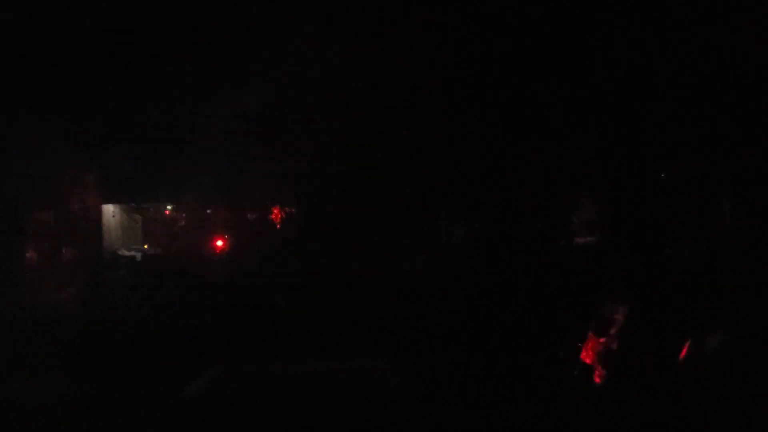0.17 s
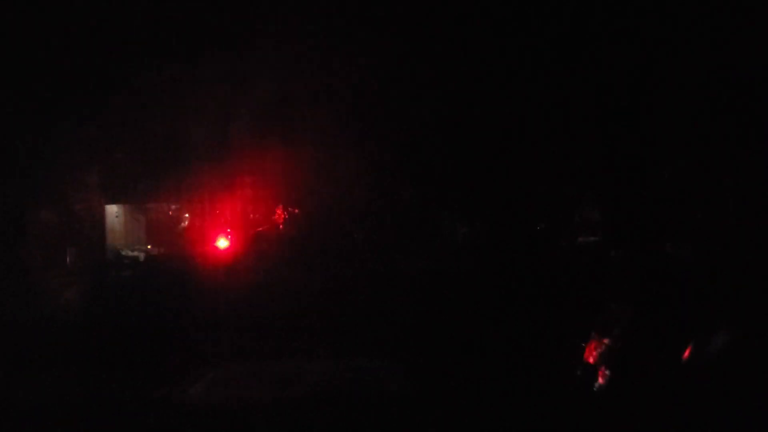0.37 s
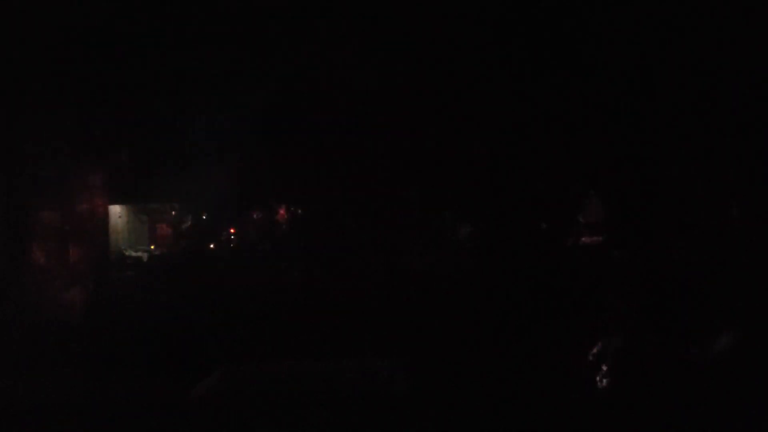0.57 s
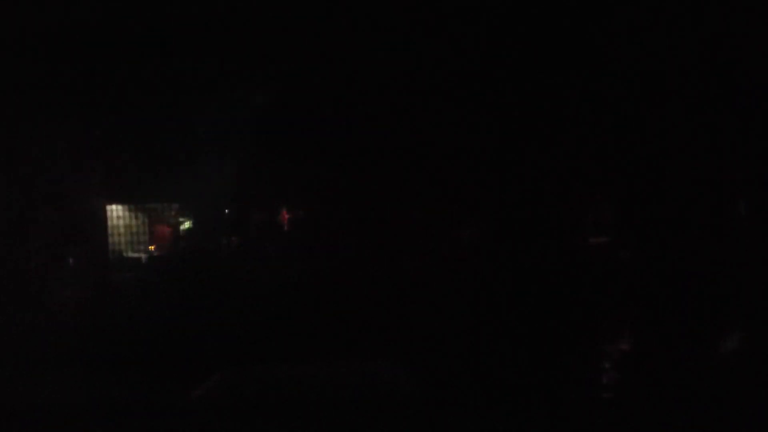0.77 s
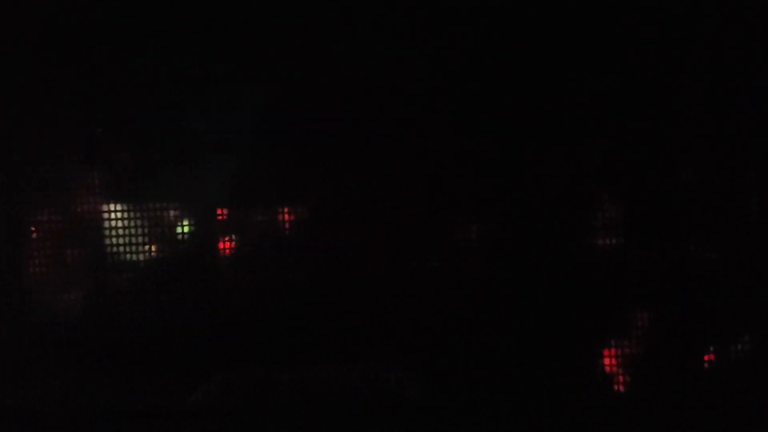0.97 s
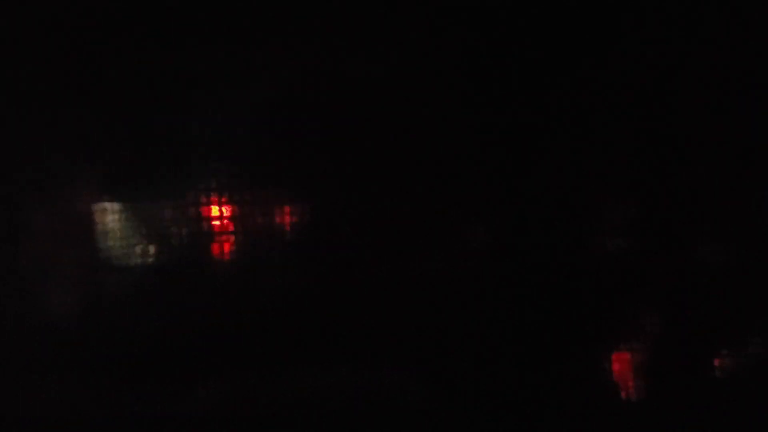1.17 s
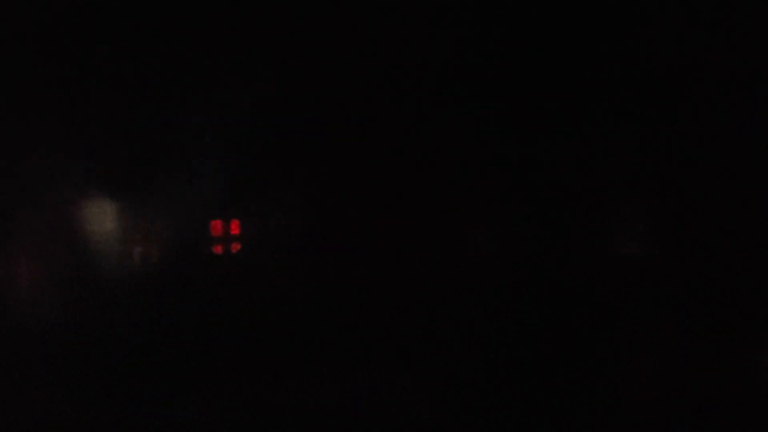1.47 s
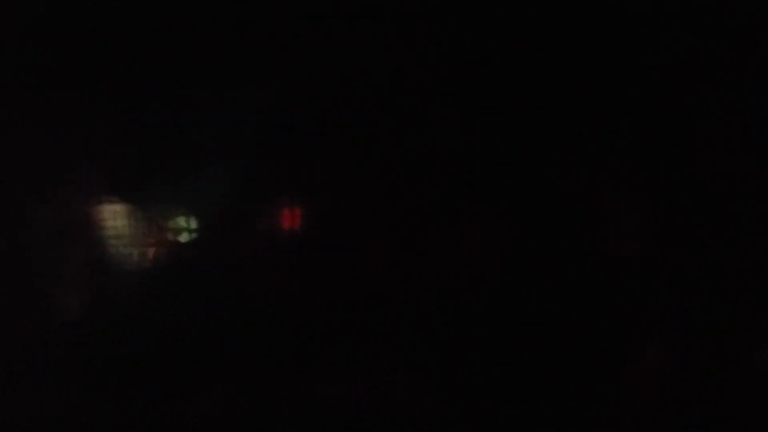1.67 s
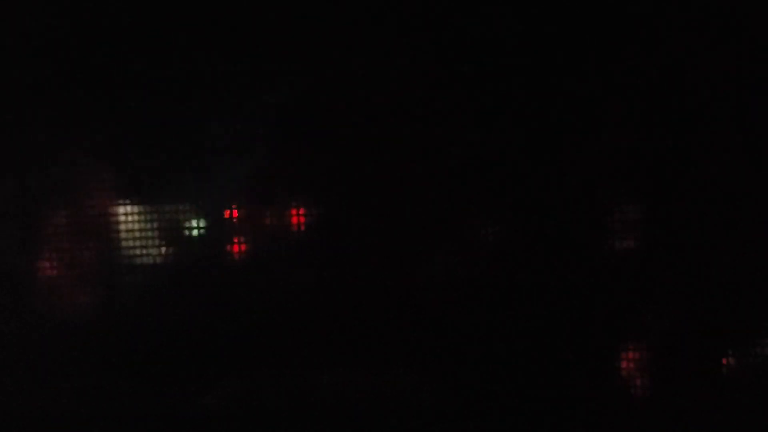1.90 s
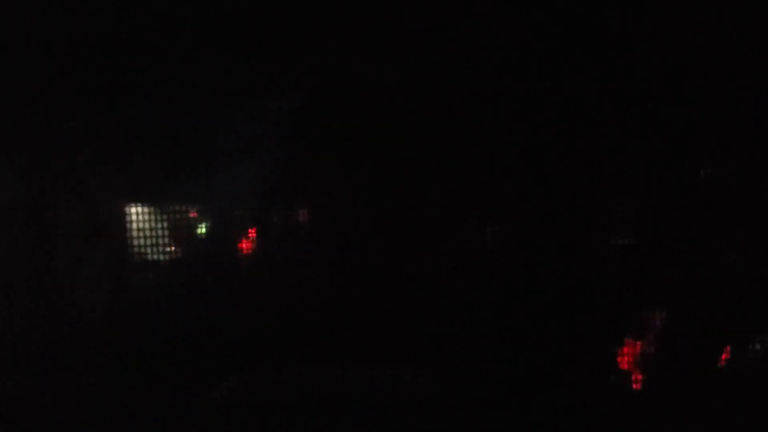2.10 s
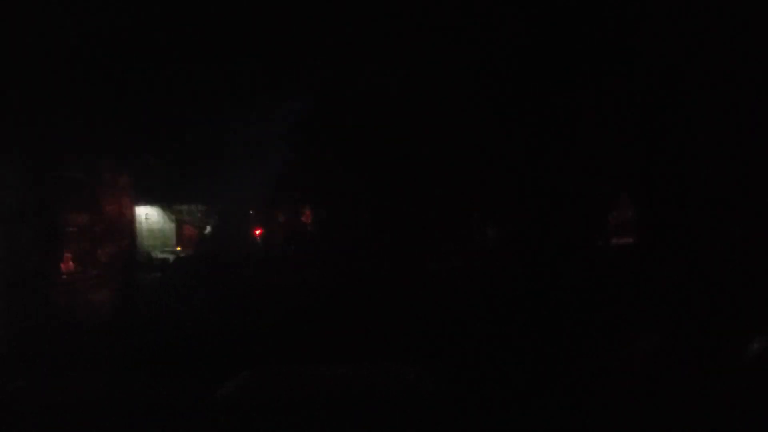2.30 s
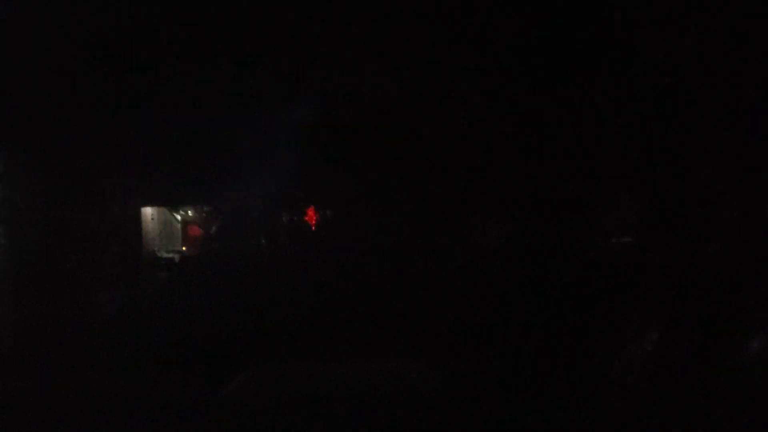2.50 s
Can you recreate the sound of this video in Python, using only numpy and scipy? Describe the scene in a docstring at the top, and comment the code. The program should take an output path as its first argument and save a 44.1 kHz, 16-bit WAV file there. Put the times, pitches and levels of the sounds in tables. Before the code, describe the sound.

Muffled, gusting wind heard from indoors over a steady hum, then two quick close clicks.

```python
"""Storm wind heard inside a house at night. From the start the walls pass a low, gusting rumble and a
faint roar, over an appliance's steady hum and the recorder's own hiss. At 1.5 s comes one small tick,
and near 2 s the wind moans faintly. At 2.3 s and 2.44 s a sharp double click sounds close to the
microphones, like a catch pressed and let go: each snap rings damped modes, and the room answers briefly."""
import sys
import numpy as np
from scipy import signal
from scipy.fft import rfft, irfft
from scipy.io import wavfile
from scipy.ndimage import uniform_filter1d

SR = 44100
rng = np.random.default_rng(int(sys.argv[2]) if len(sys.argv) > 2 else 0)


def inscribe(sig):
    """Save sig as 16-bit PCM at rate SR to the path in sys.argv[1].

    A 1-D sig is mono; a 2-D sig holds one channel per row.
    Samples are clipped to [-1, 1] before scaling.
    """
    pcm = np.round(np.clip(np.atleast_2d(sig).T, -1, 1) * 32767)
    wavfile.write(sys.argv[1], SR, pcm.astype(np.int16))


N = 116865
T = np.arange(N) / SR

# Spectra of the house's deep boom, the rumble through the walls and the airy roar: f/Hz, relative level/dB
BOOM_SPECTRUM = [(10, -34), (25, -27), (31, -14), (37, 0), (41, -1), (48, -9), (70, -25), (200, -60)]
RUMBLE_SPECTRUM = [(10, -32), (30, -24), (44, -5.5), (58, -5), (67, -4), (75, -1.5), (84, -5), (95, -2),
                   (110, 0), (135, -3.5), (160, -9.5), (175, -10), (200, -13), (230, -14.5), (275, -19),
                   (320, -26), (364, -19.5), (410, -38), (480, -33.5), (600, -56.5), (1200, -86)]
ROAR_SPECTRUM = [(100, -1), (400, 4), (650, 1), (900, -2), (1150, -3.5), (1400, -8), (2000, -9),
                 (3000, -14), (4100, -15.5), (5200, -21.5), (8000, -36), (16000, -80)]
# Envelopes of the boom and the roar: t/s, level/dB
BOOM_ENVELOPE = [(0, -49.5), (.22, -51.5), (.35, -49), (.6, -50), (.8, -54.5), (1.1, -48.5), (1.25, -49),
                 (1.4, -55), (1.52, -48), (1.7, -48.5), (1.85, -58), (2.05, -50.5), (2.16, -52),
                 (2.32, -53), (2.52, -63), (2.65, -69)]
ROAR_ENVELOPE = [(0, -64), (.7, -63.5), (.84, -62.5), (.92, -62.5), (1.3, -63.5), (1.85, -63.5),
                 (2.1, -62.5), (2.65, -63.5)]
# Strength of the wind: t/s, relative level/dB
GUSTS = [(0, -41), (.25, -40), (.33, -39), (.55, -40.5), (.68, -39.5), (.8, -41.5), (.87, -38.5),
         (.95, -41.5), (1.02, -35.5), (1.12, -41.5), (1.2, -38.5), (1.34, -39.5), (1.41, -44), (1.55, -38),
         (1.75, -40.5), (2.05, -40.5), (2.17, -42.5), (2.44, -37.5), (2.65, -41.5)]
# Moans of the wind: onset t/s, duration t/s, initial f/Hz, final f/Hz, level/dB
MOANS = [(1.87, .2, 1010, 930, -73.5), (1.98, .24, 880, 930, -72.5)]
# The double click: t/s, ring and room level/dB, ring cutoff f/Hz, snap level/dB
CLICKS = [(2.30271, 0.5, 5600, -38), (2.4433, -1.4, 4400, -37.5)]
# Modes of the clicking part: f/Hz, T60/s, left level/dB, right level/dB, left polarity, right polarity
CLICK_MODES = [(101, .044, -25, -21, 1, 1), (316, .02, -10.9, -8.8, -1, 1), (370, .0045, -9.6, -8.2, 1, -1),
               (749, .0174, -13.7, -19.8, 1, -1), (1064, .0133, -11.8, -24.6, 1, -1),
               (1144, .0034, -1.2, -12.6, -1, -1), (1225, .039, -35, -60, 1, -1),
               (1585, .0089, -13.6, -40, 1, -1), (1777, .0078, -10.5, -27.3, -1, -1),
               (2081, .0078, -18.3, -32.8, 1, -1), (2769, .0085, -60, -31.5, 1, -1),
               (3171, .0085, -26.6, -44, -1, -1), (4005, .0044, -17.8, -49, 1, -1),
               (6382, .008, -35.4, -54, -1, -1)]
# Spectra of the snap, the tick and the room's reverberation: f/Hz, relative level/dB
SNAP_SPECTRUM = [(1000, -6), (5000, -6), (7000, -2.5), (9000, -27), (12000, -3), (16000, -5)]
TICK_SPECTRUM = [(300, -10), (850, 2), (1400, -6), (2000, -5), (3200, -5), (4500, -12), (7000, -11),
                 (9000, -18), (11500, -14), (16000, -26)]
ROOM_SPECTRUM = [(100, -2), (400, 13), (1000, 7.5), (2000, 0.5), (3000, -6.5), (4200, -4.5), (5500, -16),
                 (7000, -14), (9000, -42), (16000, -16)]
# Reverberation time of the room: f/Hz, T60/s
ROOM_T60 = [(200, 0.43), (1000, 0.29), (4000, 0.27), (12000, 0.57)]
# Spectrum of the recorder's self-noise: f/Hz, relative level/dB
HISS_SPECTRUM = [(500, -16), (5000, -15), (7500, -18), (9000, -14.5), (10000, -11), (11800, -4.5),
                 (13800, -5), (14300, -2), (15200, 0)]
# Envelope of a narrow band of hiss: t/s, level/dB
FIZZ_ENVELOPE = [(0, -75), (.35, -79.5), (.75, -82), (1.3, -79.5), (1.58, -77), (1.72, -83), (1.87, -79),
                 (2.05, -83.5), (2.2, -78), (2.65, -79.5)]


def wind():
    """Transmission loss rises with frequency: walls pass the wind's boom and rumble but little roar."""
    gust_db = curve(GUSTS) - curve(GUSTS).mean()
    boom = turbulence(BOOM_SPECTRUM, correlation=.96, swell_db=0, patchy_db=0, size=2048)
    rumble = turbulence(RUMBLE_SPECTRUM, correlation=.88, swell_db=.1, patchy_db=-2.15, size=2048)
    roar = turbulence(ROAR_SPECTRUM, correlation=.023, swell_db=1.2, patchy_db=1.5, size=1024)
    return (boom * amp(curve(BOOM_ENVELOPE)) * pan(left_db=2)
            + rumble * amp(gust_db - 40) * pan(left_db=3.5)
            + roar * amp(curve(ROAR_ENVELOPE)) * pan(left_db=6))


def turbulence(spectrum, correlation, swell_db, patchy_db, size):
    """Turbulent pressure is random: partly coherent stereo noise, uneven in time and frequency."""
    hop = size // 4
    a, b, c, d, patches = rng.standard_normal((N // hop + 5, size // 2 + 1, 5)).T
    patches = uniform_filter1d(patches, size=6, axis=0)  # across frequency
    patches = unit_rms(uniform_filter1d(patches, size=10, axis=1))  # across time
    left = a + 1j * b
    right = correlation * left + np.sqrt(1 - correlation ** 2) * (c + 1j * d)
    spectra = np.array([left, right]) * amp(patchy_db * patches)
    noise = signal.istft(spectra, nperseg=size, noverlap=size - hop)[1][:, :N]
    return unit_rms(colour(noise, spectrum)) * amp(swell_db * wander(rate_hz=4.3))


def moan(start, length, from_hz, to_hz, db, width_hz=130):
    """Narrow-band noise is heard as a fuzzy pitch: a moan of wind swells, glides and fades."""
    progress = np.clip((T - start) / length, 0, 1)
    phase = 2 * np.pi * np.cumsum(from_hz + (to_hz - from_hz) * progress) / SR
    tone = unit_rms(wander(width_hz / 2) * np.cos(phase) + wander(width_hz / 2) * np.sin(phase))
    swell = np.sqrt(abs(np.sin(np.pi * progress)))
    return tone * swell * amp(db) * pan(left_db=6)


def click(start, db, cutoff_hz, snap_db):
    """Free vibration: a snap rings damped modes, each with its own level and polarity per microphone."""
    delay_s = np.array([[.00025], [0]])  # the ring reaches the left side later
    age = np.maximum(T[:SR // 3] - delay_s, 0)
    ring = 0
    for hz, t60, left_db, right_db, left_sign, right_sign in CLICK_MODES:
        gains = np.sign([[left_sign], [right_sign]]) * amp([[left_db], [right_db]])
        ring += gains * np.sin(2 * np.pi * hz * age) * decay(age, t60)
    ring = signal.sosfilt(signal.butter(3, cutoff_hz, fs=SR, output="sos"), ring)
    ring_and_room = placed(start, amp(db) * (ring + amp(-12) * reverberation()))
    return ring_and_room + burst(start, snap_db, SNAP_SPECTRUM, t60=.01)


def tick(start=1.5054):
    """Direct sound and reverberant field: one small tick with a faint answer from the room."""
    direct = burst(start, db=-31.5, spectrum=TICK_SPECTRUM, t60=.008) * pan(left_db=3.5)
    return direct + placed(start, amp(-27) * reverberation())


def burst(start, db, spectrum, t60):
    """A brief transient has a broad spectrum: dry noise with a sudden onset and a fast decay."""
    envelope = (T >= start) * decay(abs(T - start), t60)
    return colour(rng.standard_normal((2, N)) * envelope, spectrum) * amp(db)


def reverberation(rise_s=.0084):
    """The room's diffuse field builds up, then each band decays with its own reverberation time."""
    hz, t, spectra = signal.stft(rng.standard_normal((2, SR // 2)), SR, nperseg=256)
    tail = signal.istft(spectra * decay(t, at_frequency(ROOM_T60, hz)[:, None]), SR, nperseg=256)[1]
    tail = colour(tail / np.linalg.norm(tail[0]), ROOM_SPECTRUM)[:, :SR // 3]
    return tail * np.minimum(T[:SR // 3] / rise_s, 1) * pan(left_db=6)


def hum(hz=240.2, drift_hz=.5, waver_db=1.1):
    """An appliance gives one spectral line, slightly modulated in frequency and amplitude."""
    phase = 2 * np.pi * np.cumsum(hz + drift_hz * wander(rate_hz=6)) / SR
    tone = np.sin(phase) * amp(waver_db * wander(rate_hz=6))
    return unit_rms(tone) * amp(-49.2) * pan(left_db=3)


def hiss(fizz_band_hz=(6110, 6980)):
    """Self-noise: broadband hiss strongest in the treble; a narrow band comes and goes on the left."""
    wide, narrow = rng.standard_normal((2, 2, N))
    band = signal.sosfilt(signal.butter(4, fizz_band_hz, "band", fs=SR, output="sos"), narrow)
    fizz = unit_rms(band) * amp(curve(FIZZ_ENVELOPE)) * pan(left_db=15)
    return unit_rms(colour(wide, HISS_SPECTRUM)) * amp(-62.5) + fizz


def amp(db):
    """Amplitude ratio of a level in decibels."""
    return 10 ** (np.asarray(db) / 20)


def decay(age, t60):
    """Exponential damping by 60 dB in t60 seconds."""
    return np.exp(-np.log(1000) * age / t60)


def unit_rms(x):
    """Normalisation to unit mean power."""
    return x / np.sqrt(np.mean(x ** 2) + 1e-20)


def at_frequency(points, hz):
    """Interpolation on a log-frequency axis."""
    f, value = np.transpose(points)
    return np.interp(np.log(hz + 1), np.log(f + 1), value)


def curve(points):
    """Linear interpolation in time."""
    return np.interp(T, *np.transpose(points))


def pan(left_db):
    """Level difference gives direction: the left gain exceeds the right by left_db."""
    return amp([[left_db / 2], [-left_db / 2]])


def colour(x, spectrum):
    """Zero-phase filtering by multiplication of spectra."""
    size = x.shape[-1]
    gain = amp(at_frequency(spectrum, np.fft.rfftfreq(size, 1 / SR)))
    return irfft(rfft(x) * gain, size)


def placed(start, sound):
    """Pure delay of a stereo sound to its onset."""
    return np.pad(sound, ((0, 0), (round(start * SR), N)))[:, :N]


def wander(rate_hz):
    """Random modulation: low-pass noise of zero mean and unit rms."""
    hz = np.fft.rfftfreq(N, 1 / SR)
    low_pass = (hz > 0) * np.exp(-(hz / rate_hz) ** 2)
    return unit_rms(irfft(rfft(rng.standard_normal(N)) * low_pass, N))


def scene():
    """Superposition: the pressures of wind, hum, hiss, tick and clicks add."""
    storm = wind() + sum(moan(*row) for row in MOANS)
    return storm + hum() + hiss() + tick() + sum(click(*row) for row in CLICKS)


def record(dry, cutoff_hz=15900):
    """Band limiting: a linear-phase low-pass filter removes the highest treble."""
    low_pass = signal.firwin(511, cutoff_hz, window=("kaiser", 9), fs=SR)
    return signal.oaconvolve(dry, low_pass[None], "same")


dry = scene()
out = record(dry)
inscribe(out)
```